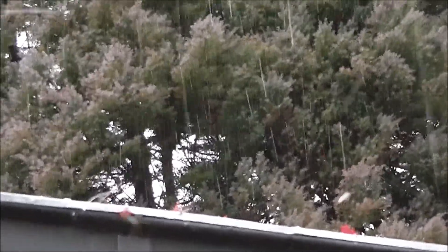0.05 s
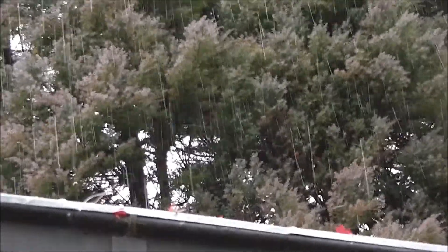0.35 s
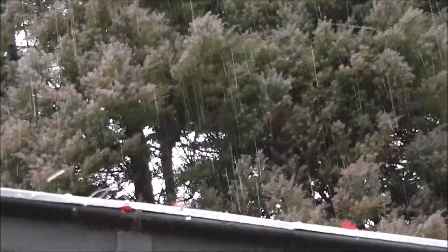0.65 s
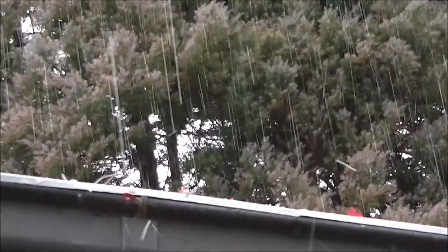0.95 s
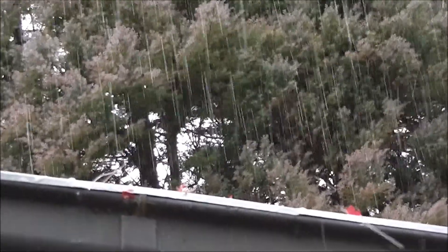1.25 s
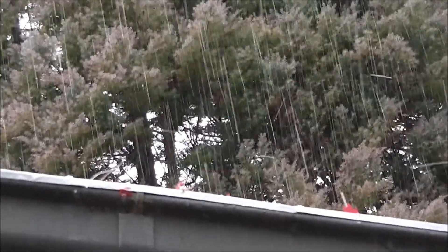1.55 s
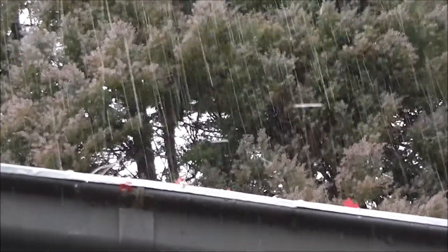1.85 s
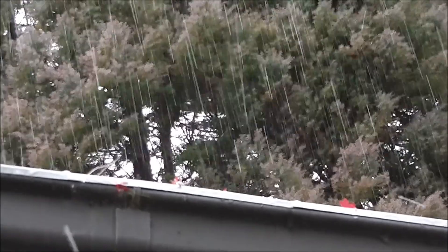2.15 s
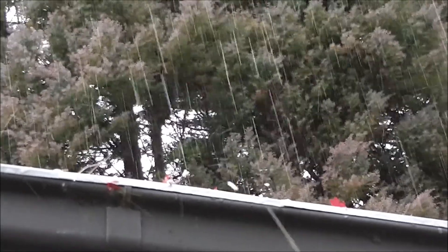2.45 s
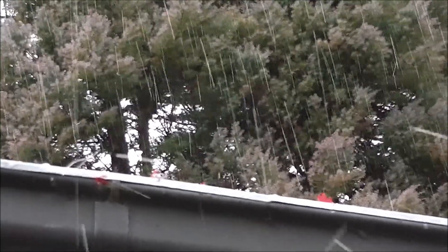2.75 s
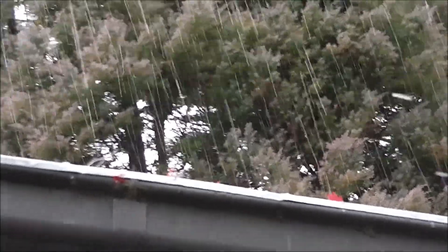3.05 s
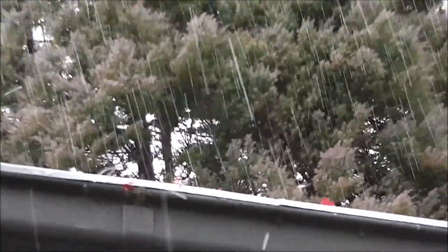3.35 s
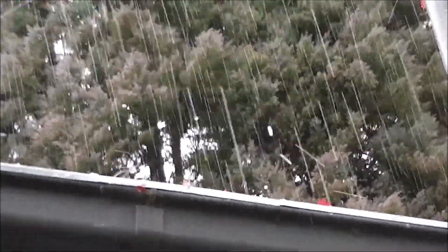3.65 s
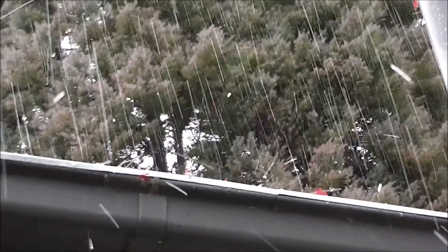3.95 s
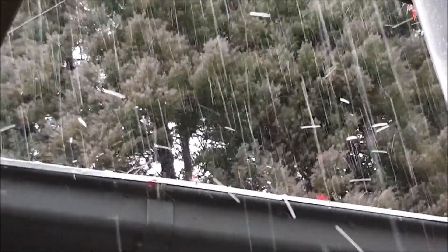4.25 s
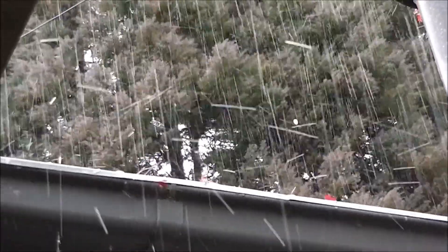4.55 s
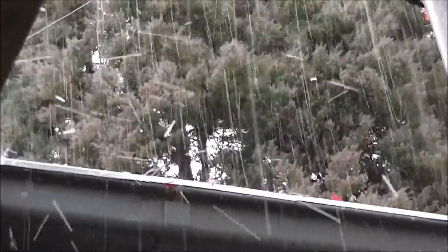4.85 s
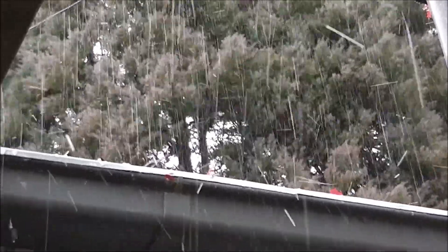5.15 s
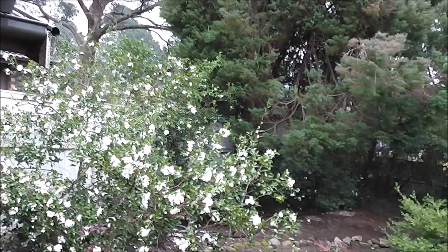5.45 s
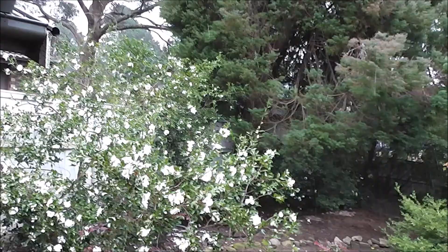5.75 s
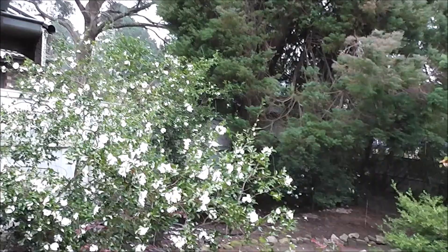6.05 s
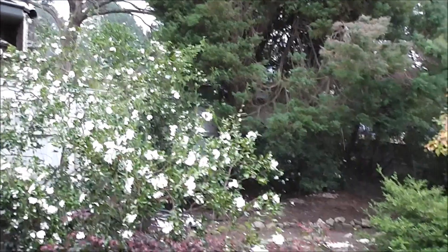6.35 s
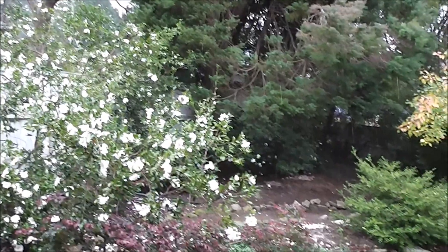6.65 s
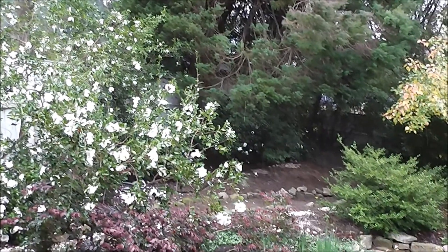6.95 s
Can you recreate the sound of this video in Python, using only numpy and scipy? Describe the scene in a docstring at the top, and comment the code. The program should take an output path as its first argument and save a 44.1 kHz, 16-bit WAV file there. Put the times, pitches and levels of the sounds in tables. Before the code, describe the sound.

Dense hail hisses and drums outdoors, stones rattling in a metal gutter; it slowly grows heavier, cuts out briefly, then resumes.

```python
"""Hail on a roof and garden

Small hail, heard from under the eaves, grows slowly heavier, with short showers. Thousands of random impacts
superpose into a drumming on the roof and a patter on leaves. Single stones ping, skitter and crack in the metal
gutter, and light air rumbles on the microphone. The drumming, patter, air and faint pings duck briefly after
hard hits; once the sound cuts out for half a second and returns facing the garden."""
import sys
import numpy as np
from scipy import signal
from scipy.fft import rfft, irfft, next_fast_len
from scipy.io import wavfile

SR = 44100
rng = np.random.default_rng(int(sys.argv[2]) if len(sys.argv) > 2 else 0)


def wav_out(sig):
    """Save sig, one row per channel (or a flat mono array), as 16-bit PCM at SR to the path in sys.argv[1]."""
    wavfile.write(sys.argv[1], SR, np.round(np.clip(np.atleast_2d(sig).T, -1, 1) * 32767).astype(np.int16))


N = 317961
TIME = np.arange(N) / SR
STOP_S, RETURN_S = 5.567, 6.068  # the gap, after which the listener faces the garden

# Strength of the hailfall: t/s, roof level/dB, patter level/dB
HAILFALL = [(0, -22.2, -24), (.5, -22.5, -23), (1.0, -22.5, -21), (1.35, -22, -22.5), (2.2, -20.5, -21.5),
            (3.3, -20, -20), (4.1, -19, -18), (4.8, -18.5, -16.5), (5.55, -18.5, -18), (6.08, -17.5, -18.5),
            (6.5, -19.1, -21), (7.2, -15.5, -17.5)]
# Stones arriving together: centre t/s, half-duration/s, level change/dB
SHOWERS = [(0.647, 0.035, 4.5), (.88, .05, 1.4), (0.975, 0.13, 2.5), (1.095, 0.06, 3.5), (1.52, 0.049, 2.5),
           (2.198, 0.11, 1), (2.575, 0.26, 0.9), (2.978, .18, 1), (3.906, 0.15, 0.3), (4.29, 0.1, 0.9),
           (4.46, 0.056, -0.5), (4.664, 0.14, 0), (5.063, 0.11, 1.1), (6.213, .07, 1)]
# Brief ducking of the sound after hard hits: start t/s, duration/s, depth/dB
LEVEL_DIPS = [(1.326, 0.058, 1), (1.834, 0.079, 3), (2.347, 0.064, 2), (2.662, 0.088, 5.5),
              (3.436, 0.076, 4), (4.343, .06, 2.5), (4.498, 0.072, 4.5), (5.149, 0.069, 2.5),
              (6.26, 0.052, 2), (7.086, 0.11, 1.5)]
# Correlation between the two ears: f/Hz, coefficient (-1 to 1)
COHERENCE = [(60, -0.32), (130, 0.19), (290, 0.98), (700, 0.89), (1500, .8), (2800, 0.4), (4500, 0.37),
             (6500, 0.56), (8200, 0.21), (10000, -0.13), (11200, -0.36), (14000, 0.18), (16000, -.05)]
# Spectrum of the roof before the gap: f/Hz, level/dB
ROOF_SPECTRUM = [(60, -32.5), (130, -10.5), (170, -20), (260, -8), (520, -7), (680, -1), (850, 0),
                 (1250, -0.5), (1750, -1), (2200, -8.5), (2800, -17.5), (4500, -12.5), (9000, -59)]
# Spectrum of the roof when facing the garden: f/Hz, level/dB
ROOF_GARDEN_SPECTRUM = [(60, -37), (150, -22.5), (260, -13), (400, -7.5), (660, -0.5), (1000, 0.5),
                        (1400, -1.5), (1800, -4), (2200, -10), (2800, -17), (4500, -11), (9000, -30)]
# Modes of the roof panels: f/Hz, width/Hz, relative level/dB
ROOF_MODES = [(128, 9.1, -61.5), (196.5, 52, -45), (805, 31, -46)]
# Spectrum of the boom under the eaves: f/Hz, level/dB
EAVES_SPECTRUM = [(40, -24), (85, -7), (125, 8), (175, -16), (300, -18.5), (700, -52)]
# Spectrum of ice striking leaves: f/Hz, level/dB
PATTER_SPECTRUM = [(700, -23.5), (2000, -10.5), (2900, -9.5), (3900, -6.5), (4500, -6.5), (5500, -0.5),
                   (6600, 0), (7800, -1.5), (9000, -4), (11000, -8), (13000, -20), (16000, -29)]
# Spectrum of the fine spray of shattered ice: f/Hz, level/dB
SPRAY_SPECTRUM = [(3000, -24.5), (8000, -17.5), (12000, 9), (14000, 3), (16000, 5.5)]
# Strength of the spray: t/s, level relative to the patter/dB
SPRAY_SHARE = [(0, -18.5), (.62, -11), (.85, -15), (1.5, -12), (2.2, -17), (3.2, -15.5), (4, -9.5),
               (4.8, -15), (6.1, -13), (7.2, -18)]
# Spectrum of the struck gutter: f/Hz, level/dB
GUTTER_SPECTRUM = [(2000, -23.5), (4000, -11), (5300, -8.5), (6400, 2), (7900, 0.5), (9200, -4.5),
                   (11000, -12.5), (16000, -42)]
# Spectrum of air on the microphone: f/Hz, level/dB
WIND_SPECTRUM = [(15, -9.5), (35, 0), (70, 4.5), (110, 1), (180, -2), (300, -11), (700, -16)]
# Strength of that air: t/s, level/dB
BREEZE = [(0, -29), (.35, -32.5), (2.4, -34.5), (3.5, -39), (4.4, -49), (5.55, -56), (6.08, -31.5),
          (7.2, -38)]
# Stones that make the gutter ring: t/s, f/Hz, level/dB
PINGS = [(1.019, 4600, -20), (6.425, 5080, -18)]
# Stones that skitter in the gutter: t/s, level/dB, resonance f/Hz, left minus right/dB
SKITTERS = [(0.3174, -15.5, 6170, 4.5), (0.4326, -17, 7920, 5), (.641, -18, 5580, 0),
            (0.718, -16.5, 7500, 4.5), (.789, -12, 6760, 2.5), (0.862, -20, 6380, 4),
            (0.9898, -15, 6440, .5), (1.0188, -20, 6600, 4.5), (1.1476, -20.5, 6500, 4),
            (1.22, -14.5, 8200, 5), (1.679, -16.5, 7770, 0), (1.7763, -16.5, 5790, 2),
            (1.825, -14.5, 7710, 5.5), (2.1216, -19, 6380, 5.5), (2.16, -15.5, 6070, 4),
            (2.318, -15.5, 6340, 4), (2.342, -16, 7260, 4), (2.519, -18.5, 5530, 4.5),
            (2.6615, -13, 7950, 3), (2.7266, -15.5, 7190, 5.5), (2.827, -14.5, 7170, 4),
            (2.9123, -20, 6740, 4), (2.948, -19, 6350, -2), (3.001, -15, 6730, 1), (3.051, -16, 7150, 4),
            (3.1096, -13.5, 7330, 5), (3.434, -17, 6400, 6), (3.5154, -15.5, 6290, 4),
            (3.8401, -14.5, 6720, 6), (4.2394, -13.5, 7320, -2.5), (4.3454, -13, 6950, -1),
            (4.5949, -14, 6190, 3), (4.88, -12.5, 6410, 5), (6.4233, -16.5, 4990, -1.5),
            (7.0676, -16, 6700, 4)]
# Stones that shatter close by: t/s, level/dB, left minus right/dB
CRACKS = [(.3535, -13, -7), (0.363, -12, 2), (.5838, -8.5, -4), (0.595, -17, 0), (.662, -15.5, -3),
          (.954, -10, -5), (1.512, -13, -3), (1.923, -9, -5), (3.706, -10, -4.5), (3.885, -14, -9),
          (3.98, -10.5, -4.5), (4.244, -12, -5), (4.473, -12, -4), (5.3, -16, -4.5), (6.378, -13, -1)]
# Spectrum of a shattering stone: f/Hz, level/dB
CRACK_SPECTRUM = [(300, -22), (1500, -26), (3000, -10), (5000, 5.5), (7000, 5.5), (11000, 0), (16000, -8.5)]


def amp(db):
    """Amplitude ratio of a level in decibels."""
    return 10 ** (np.asarray(db) / 20)


def unit(x):
    """Normalisation to rms 1."""
    return x / np.sqrt(np.mean(x ** 2) + 1e-20)


def curve(rows, column=1):
    """Linear interpolation of a table column over time."""
    rows = np.vstack(rows)
    return np.interp(TIME, rows[:, 0], rows[:, column])


def spectrum_at(points, hz):
    """Linear interpolation of a table over log frequency."""
    f, value = np.transpose(points)
    return np.interp(np.log(hz + 1), np.log(f), value)


def pan(pair, lean_db):
    """Interaural level difference: a positive lean moves the sound to the left."""
    return np.array([pair[0] * amp(lean_db / 2), pair[1] * amp(-lean_db / 2)])


def add(mix, start_s, sound):
    """Linear superposition of a sound on the mix."""
    part = mix[:, round(start_s * SR):][:, :sound.shape[1]]
    part += sound[:, :part.shape[1]]


def binaural(pair, response):
    """Partial coherence: two independent signals, filtered by response(hz), mix as mid and side."""
    size = next_fast_len(pair.shape[1])
    hz = np.fft.rfftfreq(size, 1 / SR)
    first, second = rfft(pair, size)
    coherence = np.clip(spectrum_at(COHERENCE, hz), -1, 1)
    mid, side = first * np.sqrt(1 + coherence), second * np.sqrt(1 - coherence)
    ears = np.array([mid + side, mid - side]) * response(hz)
    return unit(irfft(ears, size)[:, :pair.shape[1]])


def coloured(pair, spectrum):
    """Source and filter: a tabled spectrum shapes the sound at both ears."""
    return binaural(pair, lambda hz: amp(spectrum_at(spectrum, hz)))


def resonance(hz, centre, width):
    """Complex frequency response of a damped oscillator."""
    return 1j * hz * width / (centre ** 2 - hz ** 2 + 1j * hz * width)


def flurry(rate_hz):
    """Slow band-limited noise of rms 1 models gusts of air and clumps of stones."""
    hz = np.arange(N // 2 + 1) * SR / N
    band = hz ** 2 / (hz ** 2 + rate_hz ** 2 / 20) / (1 + (hz / rate_hz) ** 2)
    return unit(irfft(rfft(rng.standard_normal(N)) * band, N))


def impacts(per_s, spread_db, ring_s, tail_db, tail_s, spots=8):
    """Shot noise: random blows excite several spots, each with a short ring and a scattered tail."""
    chance, spot = rng.random(N), rng.integers(0, spots, N)
    sizes = np.minimum(rng.exponential(1, N), 3)
    blows = (chance < per_s / SR) * amp(spread_db * sizes) * rng.choice([-1, 1], N) / np.sqrt(per_s)
    t = TIME[:SR // 14]
    decay = np.exp(-t / ring_s) + amp(tail_db) * np.exp(-t / tail_s)
    spectra = rfft(rng.standard_normal((spots, 2, len(t))) * decay)
    spectra /= np.sqrt(np.mean(abs(spectra) ** 2, axis=0))  # the spots differ, but their sum is flat
    rings = np.roll(irfft(spectra), SR // 200, axis=-1)
    struck = (signal.oaconvolve((blows * (spot == k))[None], rings[k], axes=1) for k in range(spots))
    return unit(sum(struck)[:, :N])


def showers():
    """Amplitude modulation, in dB: each shower is one smooth arch."""
    return sum(db * np.cos(np.pi * np.clip((TIME - centre) / (2 * half), -.5, .5)) ** 4
               for centre, half, db in SHOWERS)


def level_dips(onset_s=.012, recovery_s=.035):
    """Gain reduction, in dB: at tabled times after hard hits the sound ducks, holds and recovers."""
    return sum(db * np.clip(np.minimum((TIME - s) / onset_s, (s + length - TIME) / recovery_s) + .5, 0, 1)
               for s, length, db in LEVEL_DIPS)


def hail_lean():
    """Level difference, in dB: the hail lies to the left until the listener faces the garden."""
    return np.where(TIME < RETURN_S, 2, -.2)


def roof():
    """Forced vibration: dense blows merge into a hollow drumming with panel modes, over a low boom."""
    blows = impacts(per_s=6500, spread_db=2.6, ring_s=.0012, tail_db=-16, tail_s=.009, spots=18)
    modes = sum(amp(db + 14.5) * binaural(blows, lambda hz: resonance(hz, f, width) ** 2)
                for f, width, db in ROOF_MODES)
    facing_garden = coloured(blows, ROOF_GARDEN_SPECTRUM) + .46 * modes
    drum = np.where(TIME < RETURN_S, coloured(blows, ROOF_SPECTRUM) + modes, facing_garden)
    level_db = curve(HAILFALL) + showers() - level_dips() + .4 * flurry(rate_hz=14)
    boom = coloured(rng.standard_normal((2, N)), EAVES_SPECTRUM) * amp(-51.5)
    return pan(drum, .4 * hail_lean() + .4) * amp(level_db) + boom


def patter_level():
    """Common modulation, in dB: the patter swells in the showers and ducks with roof and wind."""
    return curve(HAILFALL, column=2) + showers() - .94 * level_dips()


def patter():
    """Incoherent summation: far stones hiss on leaves, near ones tick and spray, the gutter rattles."""
    fall_db = curve(HAILFALL, column=2)
    density = amp(.8 * (fall_db - fall_db.mean())) ** 2  # lighter hail means fewer stones
    far = impacts(per_s=5000 * density, spread_db=1, ring_s=.00038, tail_db=-9.5, tail_s=.0039)
    near = impacts(per_s=520 * density, spread_db=4, ring_s=.0003, tail_db=-3.5, tail_s=.007)
    chips = impacts(per_s=1050 * density, spread_db=3.5, ring_s=.0007, tail_db=-16, tail_s=.0044)
    bounces = impacts(per_s=80 * density, spread_db=5, ring_s=.0021, tail_db=6, tail_s=.029)
    lean_db = hail_lean()
    leaves = pan(coloured(unit(far + amp(-7) * near), PATTER_SPECTRUM), lean_db + .3)
    rattle = pan(coloured(bounces, GUTTER_SPECTRUM), 1.6 * lean_db + .87) * amp(-7)
    spray = pan(coloured(unit(chips + amp(-9) * near), SPRAY_SPECTRUM), .6 * lean_db - 2.5)
    level_db = patter_level() + .45 * flurry(rate_hz=16)
    return (leaves + rattle + spray * amp(curve(SPRAY_SHARE))) * amp(level_db)


def wind(side_db=5):
    """Pressure fluctuations: gusts rumble on the microphone, driving its two sides largely in antiphase."""
    gusts_db = 3.5 * np.tanh(flurry(rate_hz=9))
    air = coloured(rng.standard_normal((2, N)), WIND_SPECTRUM)
    mid = air.mean(axis=0)
    return (mid + (air - mid) * amp(side_db)) * amp(curve(BREEZE) + gusts_db - level_dips())


def ping(hz):
    """Free vibration: one damped mode of the gutter reaches the two ears in different phase."""
    t = TIME[:SR // 20]
    tone = np.sin(2 * np.pi * (hz * t + rng.uniform(0, .18, (2, 1))))
    return tone * np.exp(-t / .011) * (1 - np.exp(-t / .00028))


def skitter(ring_hz, t60_s=.14, hops_per_s=420, width_hz=4400):
    """Inelastic rebound: a stone excites a broad resonance of the gutter in ever weaker bounces."""
    t = TIME[:SR // 6]
    hops = (rng.random(len(t)) < hops_per_s / SR) * rng.uniform(.4, 1, len(t))
    bounces = signal.lfilter([1], [1, -np.exp(-1 / (.00064 * SR))], hops)
    contact = .2 + .63 * np.exp(-t / .005) + .86 * bounces
    envelope = contact * amp(-60 * t / t60_s) * (1 - np.exp(-t / .0012))
    noise = rng.standard_normal((2, len(t))) * envelope
    sound = binaural(
        noise, lambda hz: resonance(hz, ring_hz, width_hz) * amp(.61 * spectrum_at(GUTTER_SPECTRUM, hz)))
    return sound / np.sqrt(np.mean(sound[:, :SR // 200] ** 2))  # rms 1 over the first 5 ms


def crack():
    """Brittle fracture: ice shatters in a millisecond or two, and the eaves scatter a faint tail."""
    t = TIME[:SR // 20]
    envelope = np.exp(-t / .0014) + amp(-14) * np.exp(-t / .007)
    sound = coloured(rng.standard_normal((2, len(t))) * envelope, CRACK_SPECTRUM)
    return sound / np.sqrt(np.mean(sound[:, :SR // 500] ** 2))  # rms 1 over the first 2 ms


def gutter():
    """Resolved transients: close stones are heard one by one above a scatter of faint pings."""
    close, faint = np.zeros((2, N)), np.zeros((2, N))
    for s, db, ring_hz, lean_db in SKITTERS:
        add(close, s, pan(skitter(ring_hz), lean_db) * amp(db))
    for s, db, lean_db in CRACKS:
        add(close, s, pan(crack(), lean_db) * amp(db))
    for s, hz, db in PINGS:
        add(close, s, ping(hz) * amp(db))
    for when, pitch, softness in rng.random(size=(400, 3)):
        add(faint, when * TIME[-1], ping(4200 + 4800 * pitch) * amp(-9 * softness))
    return close + pan(faint, 2.5) * amp(patter_level() - 3)


def scene():
    """Superposition: the pressures from roof, leaves, gutter and air add."""
    return roof() + patter() + gutter() + wind()


def record(dry, ceiling=.9, cutoff_hz=15850):
    """Gating, clipping and band limiting: the sound drops out, then returns with a brief overshoot."""
    dying = amp(-18) * np.exp(-np.maximum(TIME - STOP_S, 0) / .015)
    since_return = np.maximum(TIME - RETURN_S, 0)
    returning = (1 + .71 * np.exp(-since_return / .03)) * (1 - np.exp(-since_return / .0014))
    gain = np.select([TIME < STOP_S, TIME < RETURN_S], [1, dying], returning)
    low_pass = signal.firwin(511, cutoff_hz, window=("kaiser", 8), fs=SR)
    return signal.oaconvolve(np.clip(dry * gain, -ceiling, ceiling), low_pass[None], "same", axes=1)


dry = scene()
out = record(dry)
wav_out(out)
```